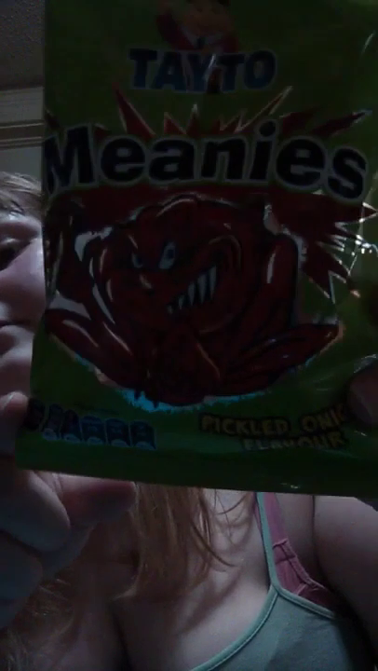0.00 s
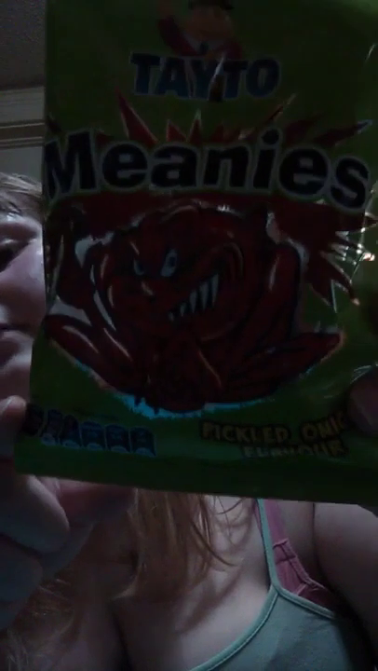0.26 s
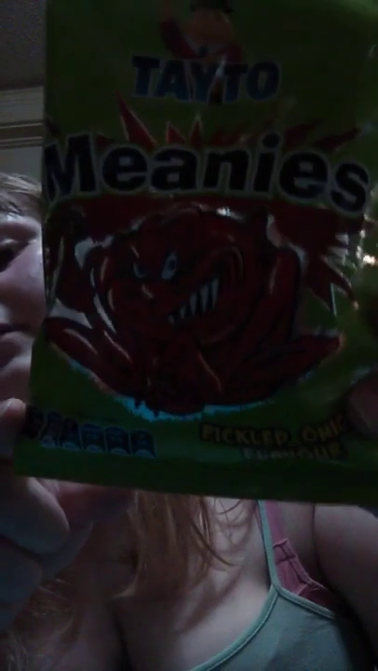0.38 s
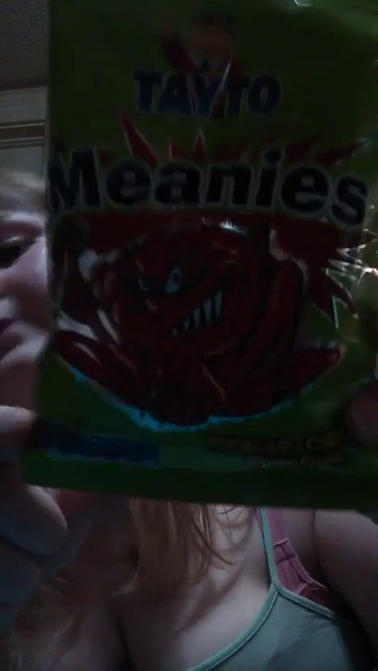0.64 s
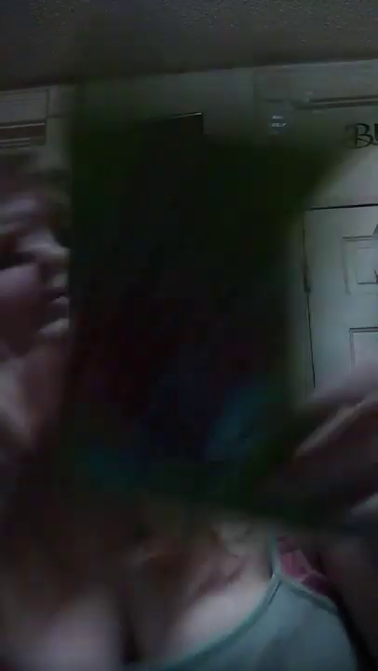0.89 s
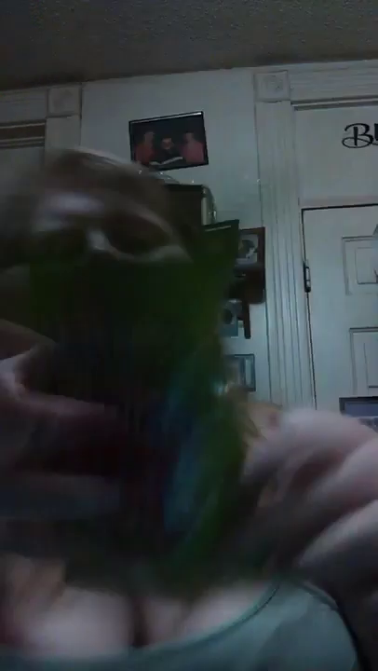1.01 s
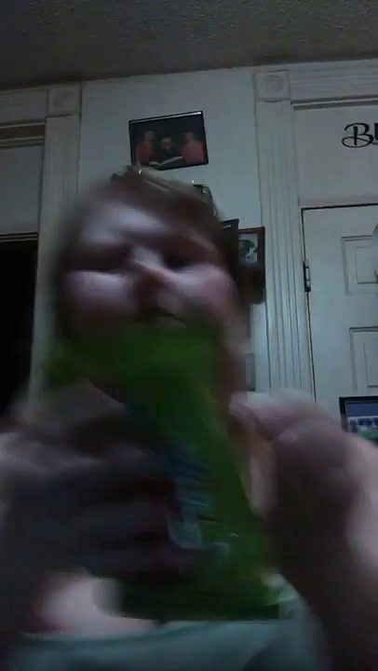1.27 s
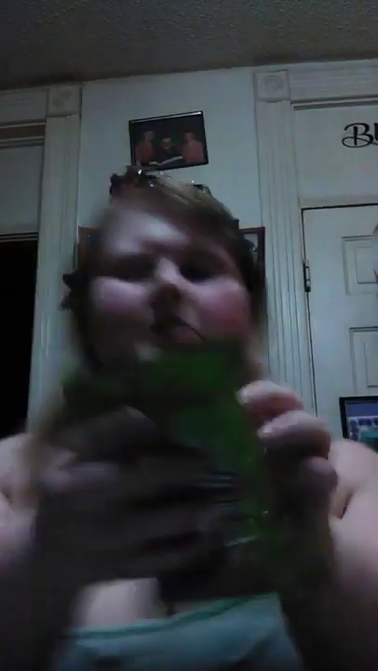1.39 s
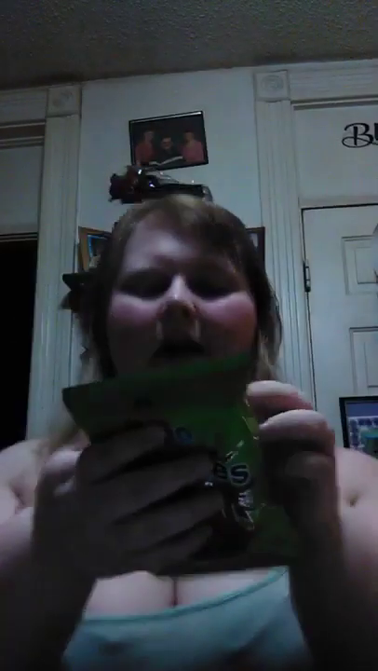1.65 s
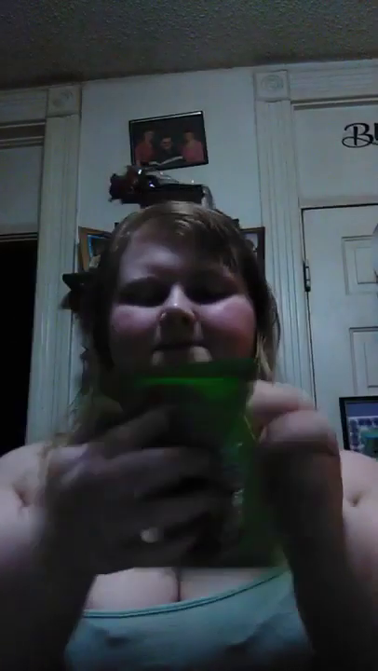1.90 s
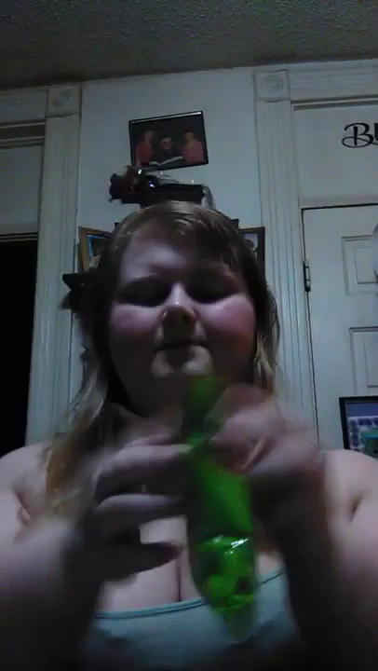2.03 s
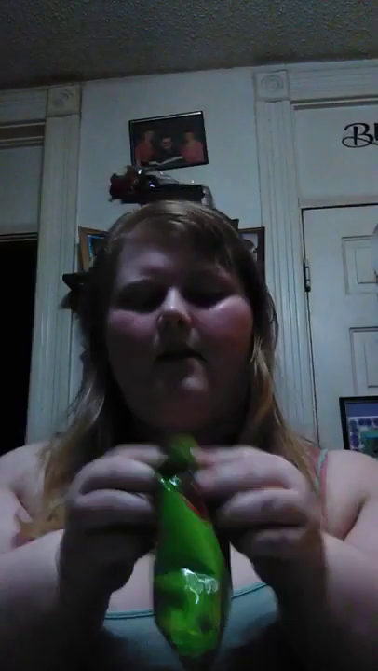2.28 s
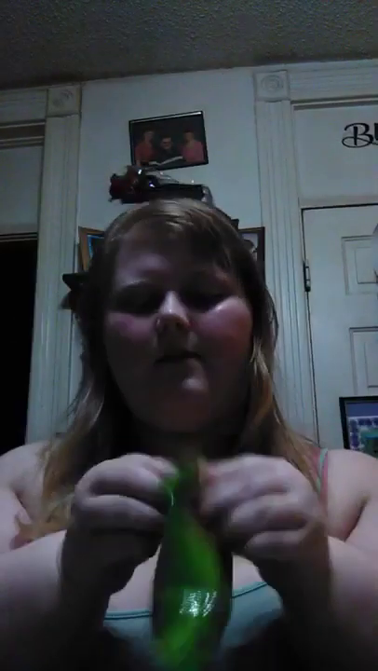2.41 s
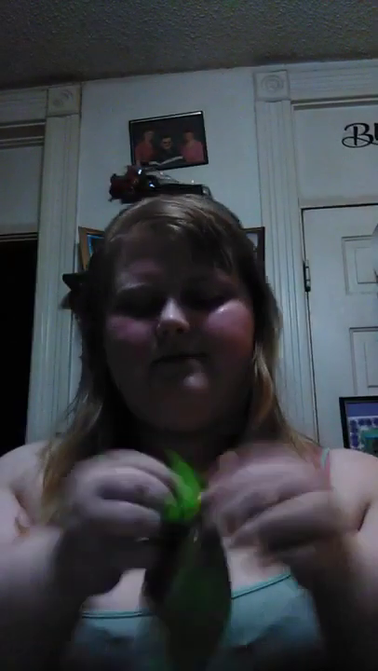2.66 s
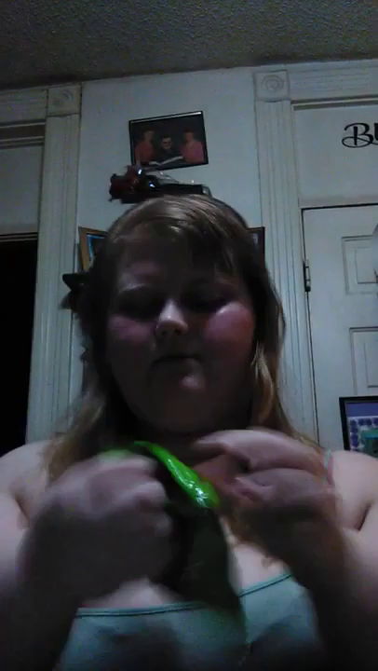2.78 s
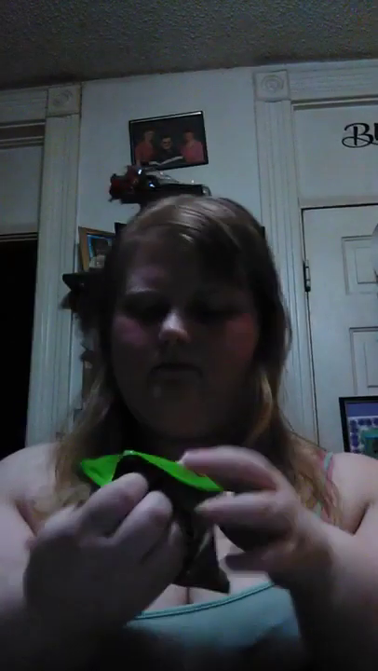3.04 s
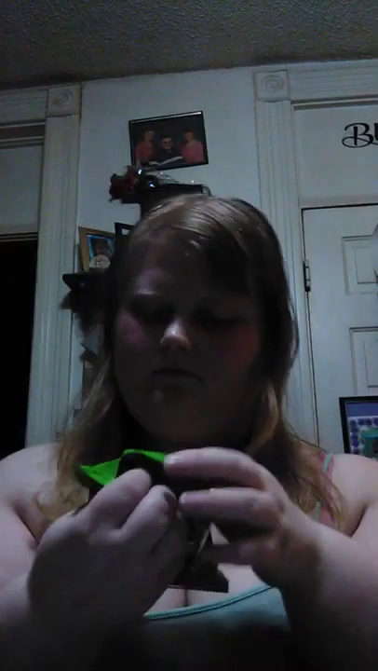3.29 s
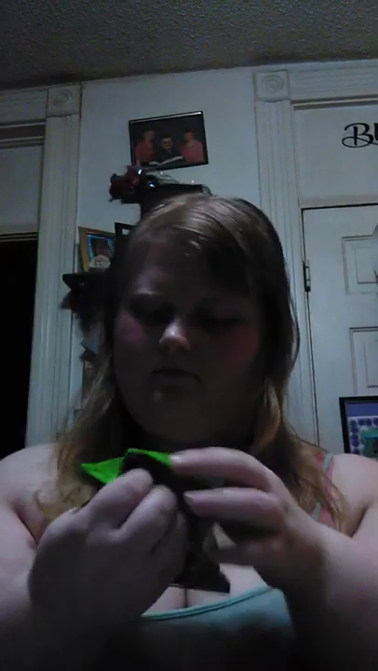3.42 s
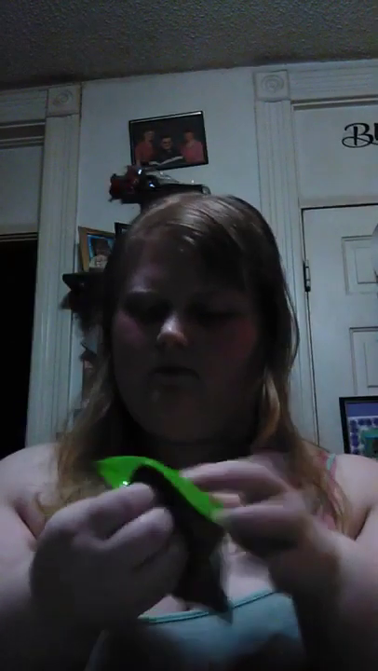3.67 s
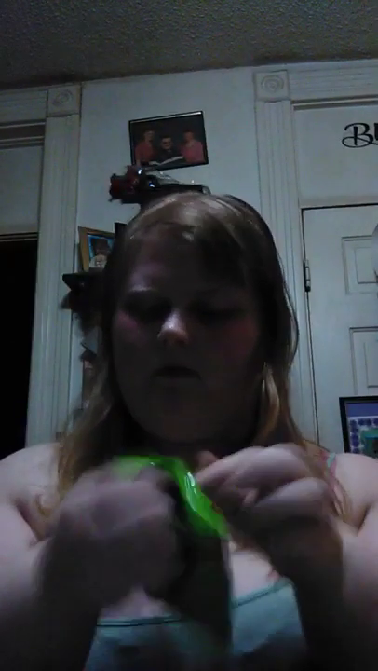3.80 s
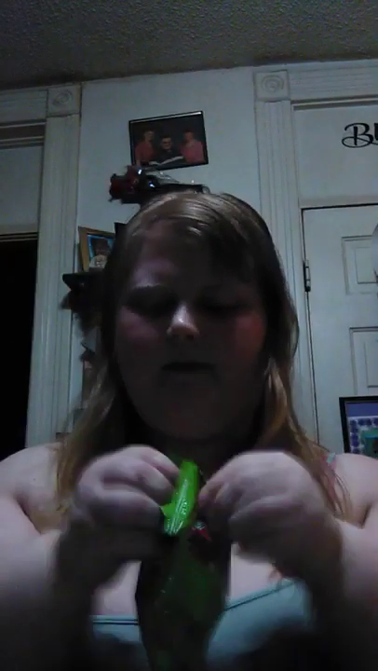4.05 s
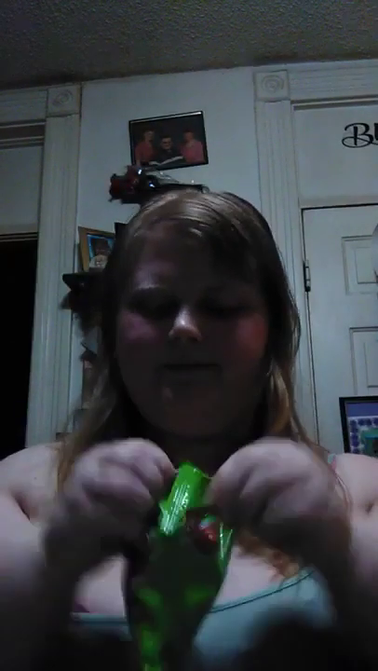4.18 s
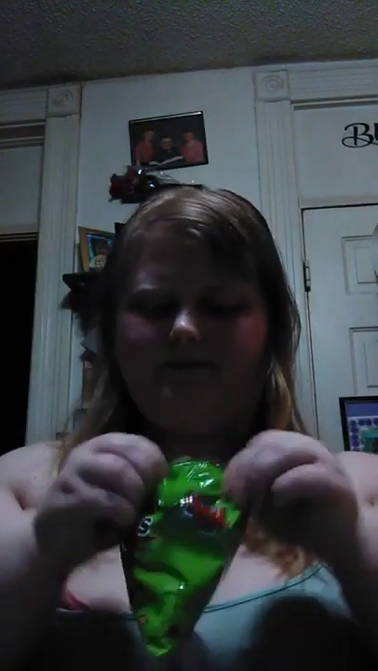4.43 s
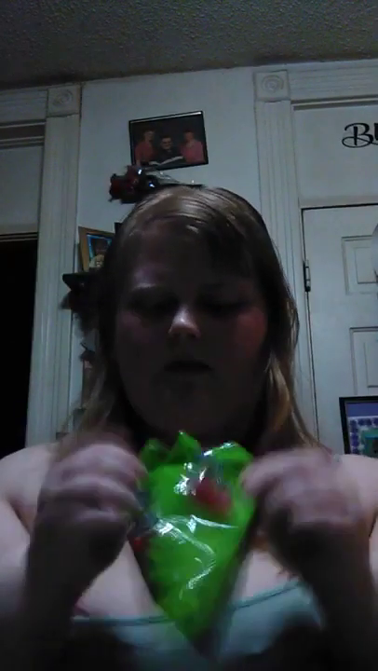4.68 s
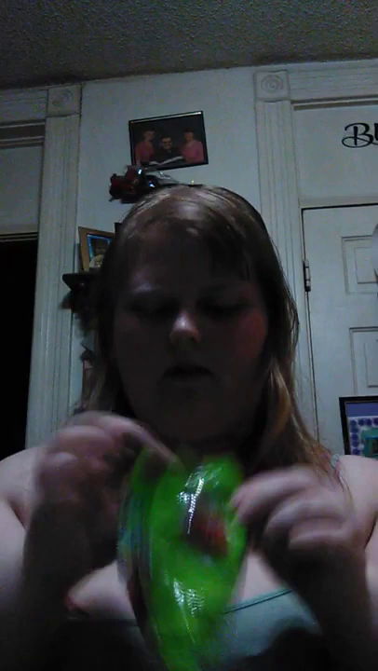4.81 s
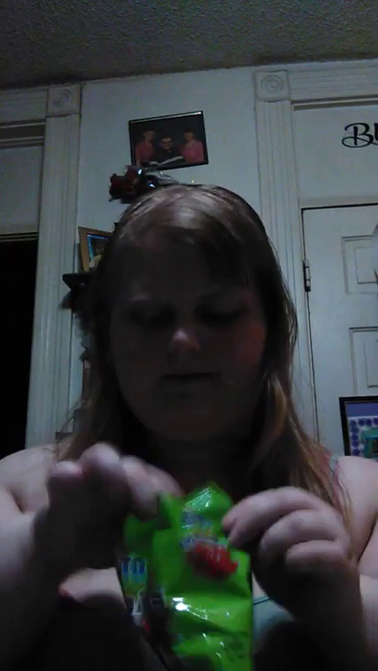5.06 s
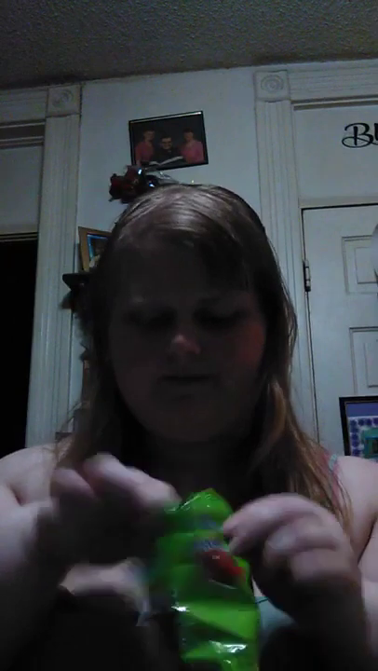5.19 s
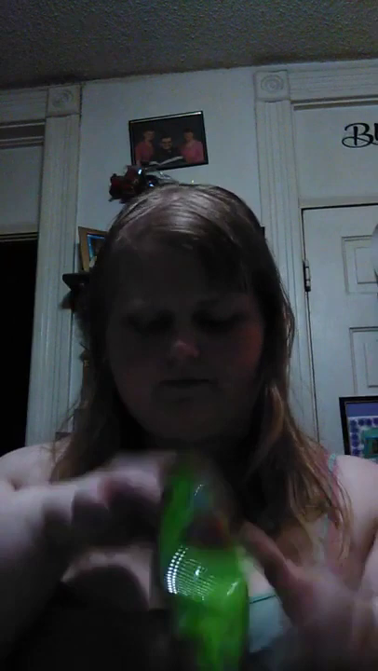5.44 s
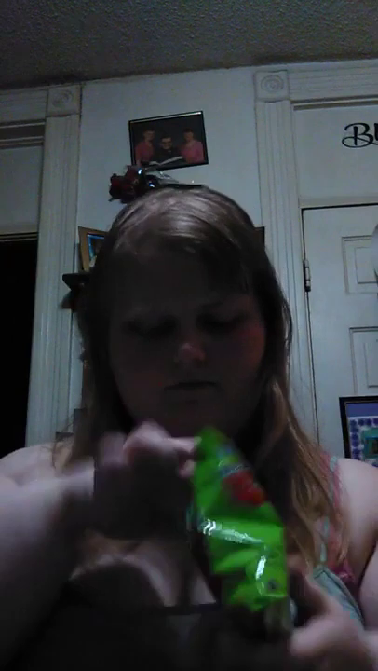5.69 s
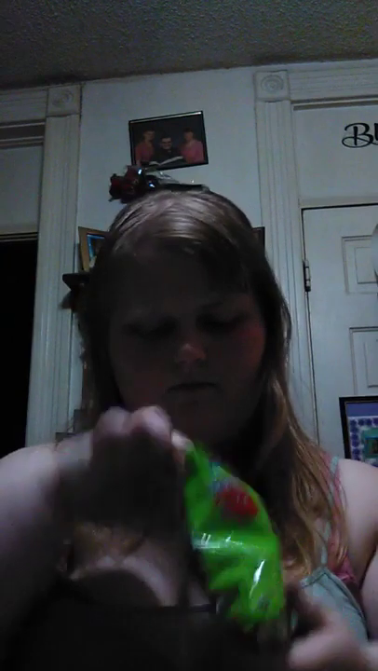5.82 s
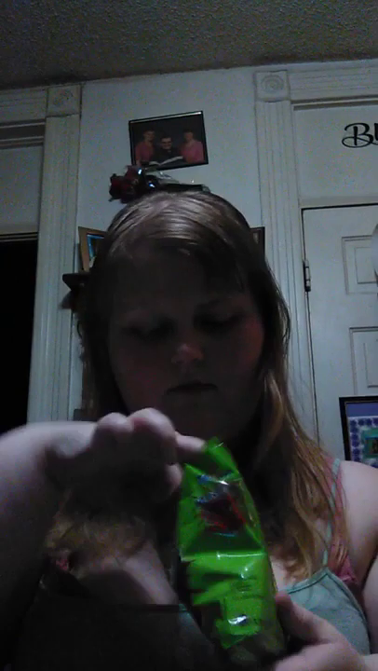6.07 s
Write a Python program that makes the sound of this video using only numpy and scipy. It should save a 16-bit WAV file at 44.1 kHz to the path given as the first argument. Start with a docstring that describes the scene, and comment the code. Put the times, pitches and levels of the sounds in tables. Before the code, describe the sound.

Close to a phone in a small room, hands work a foil-lined snack bag. After a quiet start come sharp snaps and brief crinkles, then thicker bursts of crackle with short gaps. The densest, loudest squeezing comes past the middle, and smaller rustles follow to the end. Low rumble and faint hiss fill the pauses.

```python
"""In a small room, a foil-lined snack packet is squeezed and pulled open by hand in front of a phone.
Creases snap through as short cracks, made of dying noise puffs, over a dense crackle of small creases.
Slack film and the air in the bag resonate as damped sines, the air mostly near 500 Hz.
The microphone ports ring near 8 kHz, the walls answer with echoes and a decaying noise tail,
and filtered noise gives the low rumble that fills the pauses and a faint hiss."""
import sys
import numpy as np
from scipy import signal
from scipy.fft import rfft, irfft, next_fast_len
from scipy.io import wavfile
from scipy.ndimage import uniform_filter1d, map_coordinates

SR = 44100
rng = np.random.default_rng(int(sys.argv[2]) if len(sys.argv) > 2 else 0)


def put_to_file(sound):
    """Save the sound as 16-bit audio at rate SR, in the file named by the first command-line argument."""
    columns = np.atleast_2d(sound).T  # one column per channel
    safe = np.clip(columns, -1, 1)
    whole_steps = np.round(safe * 32767)
    wavfile.write(sys.argv[1], SR, whole_steps.astype(np.int16))


N = 272097

# Creases that snap. Each row: start in seconds, crack level in dB,
# lower treble relative to the crack in dB, film body relative to the crack in dB.
SNAPS = [(0.2567, -29.5, -39, -43), (0.7102, -4.5, -15, -15.5), (0.7392, -15.5, -3.5, -6),
         (0.7832, -4, -13.5, -15), (0.79, -15, -6.5, -14), (0.8132, -14.5, -5, -17.5),
         (0.8466, -8, -13.5, -17), (0.8643, -22, -5.5, -4.5), (1.057, -8.5, -6, -17),
         (1.1189, -14, -14.5, -12), (1.1377, -4.5, -12, -16), (1.1555, -3, -17, -17),
         (1.229, -34.5, -17, 8.5), (1.2543, -12, -10, -12.5), (1.261, -8.5, -11, -14.5),
         (1.3424, -22.5, -3.5, -10.5), (1.3907, -26.5, -3, -22), (1.4332, -20, -9.5, -8),
         (1.4655, -30, -1.5, -2.5), (1.5187, -17.5, -1, -7.5), (1.5304, -22.5, 1, -20),
         (1.6282, -23, -2, -19), (1.6863, -35.5, -5, -3.5), (1.8232, -34.5, -9.5, -27.5),
         (1.9572, -30, -1, -21.5), (2.074, -2.5, -8, -22.5), (2.0853, -11.5, -16, -9.5),
         (2.147, -15.5, 2.5, -6), (2.1585, -24.5, -1, -17.5), (2.355, -34, -4, -10.5),
         (2.375, -12.5, -8, -12), (2.389, -6.5, -6, -19.5), (2.4597, -6.5, -10, -18.5),
         (2.489, -11, -4, -17), (2.507, -11.5, -1, -18), (2.5287, -16.5, -6, -20.5),
         (2.544, -15.5, -3, -22), (2.6, -10, -4.5, -26.5), (2.6368, -18, -2, -20), (2.6796, -14, -4.5, -20),
         (2.7101, -2.5, -8.5, -21.5), (2.7817, -16.5, -5.5, -11.5), (2.8348, -21, -7, -29),
         (2.8597, -18, -5, -26.5), (2.9617, -24, -5.5, -25), (2.978, -15, -6, -12.5),
         (3.0044, -18, -10, -22.5), (3.019, -16.5, -3, -14), (3.0487, -10.5, -9, -18),
         (3.2237, -22.5, -11.5, -24), (3.5882, -23, -13.5, -33), (3.6458, -3.5, -12, -20),
         (3.7873, -33.5, -31, -23.5), (3.874, -11, -3, -13.5), (3.8817, -14, -7, -10.5),
         (3.8943, -21.5, -8, -20.5), (3.9587, -12.5, -12.5, -15), (3.9674, -9.5, -14, -23),
         (4.0158, -14.5, -10, -14), (4.0432, -7, -20, -22), (4.0497, -8, -13.5, -15), (4.076, -11, -6, -22),
         (4.1195, -7, -7.5, -18), (4.141, -14.5, -5, -20.5), (4.155, -11, -7, -12),
         (4.1705, -11, -6.5, -16.5), (4.182, -15, -3.5, -13.5), (4.19, -5, -7, -10),
         (4.2067, -6.5, -7, -16.5), (4.2224, -13, -8, -15), (4.2498, -7, -4.5, -14.5),
         (4.2799, -4, -10.5, -23), (4.308, -11, -7, -11.5), (4.3195, -12, -5.5, -13),
         (4.3367, -7.5, -1.5, -23), (4.3702, -14, -4, -16.5), (4.379, -12, -2, -17),
         (4.4301, -22, -13, -17), (4.4635, -8, -25, -23), (4.476, -13, -10, -16.5),
         (4.5193, -14.5, -2.5, -17), (4.5365, -10.5, -2.5, -14), (4.5451, -3, -11.5, -13),
         (4.5777, -4.5, -6.5, -17), (4.6074, 0.5, -8.5, -22.5), (4.6463, -8.5, -14, -24),
         (4.6965, -12, -7, -15.5), (4.7137, -8.5, -14.5, -19), (4.729, -8.5, -11.5, -17),
         (4.7368, -6.5, -8, -17.5), (4.813, -24.5, 0, -14.5), (4.8934, -21, -1, -18.5),
         (4.9035, -15, -8.5, -25), (5.033, -28.5, -6, 4), (5.0555, -18, 0, -3.5), (5.0775, -19, 3, -38),
         (5.1662, -14, -14.5, -48), (5.1775, -17.5, -5, -22.5), (5.224, -19, -3.5, -21),
         (5.2707, -7.5, -10, -23), (5.3268, -3.5, -5.5, -22), (5.439, -23, -4, -16),
         (5.4551, -21.5, -10.5, -21.5), (5.4907, -23.5, -6, -14), (5.5425, -17.5, -20, -19.5),
         (5.6186, -33.5, -3.5, -15.5), (5.7034, -23.5, 0, -14), (5.7215, -12, 1, -14.5),
         (5.7253, -7.5, -18, -20.5), (5.7375, -7.5, -16.5, -13.5), (5.879, -7.5, -34, -26),
         (5.9238, -20.5, -12, -32), (5.9928, -17.5, -8.5, -8.5), (6.0105, -25.5, -8, -14),
         (6.019, -10, -18, -17), (6.041, -10.5, -4, -11.5), (6.0512, -18, -5, -12),
         (6.098, -9.5, -21, -27.5), (6.116, -19, -5.5, -15), (6.1604, -11, -9, -9)]


def snaps(steps=2):
    """Snap-through buckling: a big crease gives way in two steps within milliseconds."""
    s, db, sizzle_db, film_db = np.repeat(SNAPS, steps, axis=0).T
    luck = rng.random((len(s), 3))
    step = np.arange(len(s)) % steps
    step_s = s - 0.0003 + 0.0022 * step * (0.5 + luck[:, 0])
    step_db = db - 7 * step * (0.5 + luck[:, 1])  # the second step is weaker
    pan_db = 3 + 5 * (luck[:, 2] - 0.5)
    return packet(step_s, step_db, sizzle_db, film_db, pan_db)


# Spectrum of a crack as the ports colour it.
# Each row: frequency in Hz, relative spectral density in dB.
CRACK_SPECTRUM = [(4500, -42), (6300, -10), (7200, -3), (8400, 0.5), (9600, -6.5), (11200, -13),
                  (13800, -17), (14500, -30), (14800, -52.5)]
# Lower treble of a crack. Each row: frequency in Hz, relative spectral density in dB.
SIZZLE_SPECTRUM = [(2600, -52), (3800, -4), (5200, 0.5), (6400, 3), (8500, -42.5)]
# Body of the rattling film. Each row: frequency in Hz, relative spectral density in dB.
FILM_SPECTRUM = [(700, -52.5), (1100, -5.5), (1500, 2), (2400, 1), (3600, 4), (5500, -18.5)]


def packet(s, db, sizzle_db, film_db, pan_db):
    """Impulsive excitation: each crease cracks, rattles the film and rings a large and a small panel."""
    luck = rng.random((len(s), 2))
    crack = coloured(puffs(s, db, pan_db, t60=0.007, alike=0.3), CRACK_SPECTRUM)
    sizzle = coloured(puffs(s, db + sizzle_db, pan_db - 3, t60=0.0073, alike=0.12), SIZZLE_SPECTRUM)
    rattle = coloured(puffs(s, db + film_db, pan_db - 3, t60=0.046, alike=0.7), FILM_SPECTRUM)
    # each panel draws its own pitch
    large_hz = 1150 * 3.02 ** luck[:, 0]
    small_hz = 4500 * 2.6 ** luck[:, 1]
    large = rings(s, db + film_db - 3, pan_db + 2, large_hz, peak_rad=2.94, turn=0.41, lead=1.68, size=224)
    small = rings(s, db + sizzle_db / 2 - 6.5, pan_db, small_hz, peak_rad=4.5, turn=1.6, size=128)
    return crack + sizzle + rattle + large + small


# Air pushed in the bag by small creases.
# Each row: frequency in Hz, relative spectral density in dB.
BAG_AIR_SPECTRUM = [(200, -31), (380, -3.5), (500, 5.5), (720, 0.5), (1000, -6), (1600, -38)]


def crackle(count=3100):
    """Crackling noise: random small creases, mostly tiny and in clumps, follow the squeezing."""
    luck = rng.random((count, 6))
    first_s = HANDLING[0][0]
    s = first_s + luck[:, 0] * (N / SR - first_s)
    db, film_db, air_db = squeezing(s)
    force = np.clip((db + 60) / 40, 0.2, 1)  # a light touch rustles evenly, a hard grip crackles
    clump_db = 2.67 * wobble(35)[(s * SR).astype(int)]
    crease_db = -4.93 * np.log(luck[:, 1] + 0.033) - 5.5  # few large, many tiny
    db = db + force * (clump_db + crease_db)
    pan_db = 3 + 8 * (luck[:, 4] - 0.5)
    puff_db = db + air_db + 9 * (luck[:, 3] - 0.5)
    air = coloured(puffs(s, puff_db, pan_db + 0.5, t60=0.017, alike=0.92), BAG_AIR_SPECTRUM)
    sizzle_db = film_db + 5 + 22 * (luck[:, 5] - 0.5)
    body_db = film_db + 18 * (luck[:, 2] - 0.5)
    return air + packet(s, db, sizzle_db, body_db, pan_db)


# Grips of the hand. Each row: moment of full force in seconds, time held in seconds,
# crackle level in dB, film body relative to it in dB, bag air relative to it in dB.
GRIPS = [(0.261, 0.014, -51.5, -35, -35), (0.718, 0.0071, -26, -7.5, -19.5), (.79, 0.13, -45, -5.5, -25),
         (1.058, 0.0081, -34, -3.5, -17.5), (1.121, 0.013, -25.5, -2.5, -17),
         (1.142, 0.038, -17.5, -13.5, -19.5), (1.258, 0.0043, -39, 0.5, -2),
         (1.527, 0.014, -41.5, -14.5, -19), (1.635, 0.043, -42, -24, -35), (1.962, 0.071, -35.5, -9, -16),
         (2.054, 0.0081, -28, -3.5, -17.5), (2.079, 0.011, -22.5, -8.5, -18),
         (2.154, 0.028, -15, -17, -23.5), (2.37, 0.018, -19.5, -12.5, -21.5),
         (2.491, 0.085, -25.5, -10, -8), (2.64, 0.069, -24, -13.5, -14), (2.703, 0.0099, -19, -12, -20),
         (2.981, 0.066, -29.5, -16, -17.5), (3.047, 0.0067, -25, -15, -17.5),
         (3.23, 0.048, -39.5, -30.5, -34), (3.59, 0.076, -42, -25, -20.5), (3.879, 0.05, -31.5, -13, -15.5),
         (3.962, 0.011, -26.5, -17.5, -15.5), (4.044, 0.029, -27, -10, -12), (4.125, 0.12, -20, -12.5, -16),
         (4.231, 0.064, -25.5, -14, -11), (4.317, 0.023, -19.5, -18, -13), (4.517, 0.053, -11.5, -13, -14),
         (4.61, 0.023, -22, -12, -13), (4.716, 0.0058, -26.5, -9, -14), (4.901, 0.052, -32.5, -17, -29),
         (5.031, 0.081, -25.5, -17, -17.5), (5.178, 0.059, -18, -16.5, -19), (5.276, 0.053, -18, -13, -18),
         (5.445, 0.088, -40.5, -11, -17.5), (5.642, 0.012, -43, -13, -15),
         (5.724, 0.014, -20.5, -13.5, -25), (5.886, 0.1, -35, -11.5, 1), (6.013, 0.052, -23, -16, -18)]
TIGHTEN_DB_PER_S, LET_GO_DB_PER_S = 894, 261
# Rustle in the fingers between grips. Each row: time in seconds, crackle level in dB.
HANDLING = [(.25, -79.5), (.5, -74), (.54, -62), (.69, -42), (.97, -45.5), (1.05, -43), (1.5, -43.5),
            (1.8, -68.5), (1.94, -42), (2.3, -39.5), (2.9, -48.5), (3.15, -59.5), (3.5, -68.5),
            (3.84, -65.5), (4.1, -23), (4.48, -28.5), (4.87, -62), (5.0, -43), (5.65, -50.5), (5.8, -37),
            (6.17, -28)]
HANDLING_FILM_DB, HANDLING_AIR_DB = -13, -24  # relative to the crackle


def squeezing(s):
    """Dominance of the strongest force: crackle, film and air levels as grips tighten, hold and let go."""
    full, held, db, film_db, air_db = np.transpose(GRIPS)[:, :, None]
    tightening = TIGHTEN_DB_PER_S * np.maximum(full - s, 0)
    letting_go = LET_GO_DB_PER_S * np.maximum(s - full - held, 0)
    handling = np.interp(s, *np.transpose(HANDLING))
    level = np.vstack([db - tightening - letting_go, handling])
    which = level.argmax(axis=0)
    film = np.append(film_db, HANDLING_FILM_DB)[which]
    air = np.append(air_db, HANDLING_AIR_DB)[which]
    return level.max(axis=0), film, air


# Slack panels of film that ring out. Each row: start in seconds, relative level in dB, pitch in Hz.
PANELS = [(1.1183, -29, 1640), (2.681, -27.5, 1510), (4.1908, -22.5, 1520), (4.2506, -21.5, 1760),
          (4.815, -33, 2600), (5.0579, -19, 1770), (5.3334, -21.5, 1480), (5.651, -35, 1470),
          (5.878, -26.5, 1460), (6.049, -22, 2000)]


def panels():
    """Damped plate resonance: a slack panel rings briefly after its crease gives way."""
    s, db, hz = np.transpose(PANELS)
    pan_db = np.full(len(s), -0.6)
    return rings(s - 0.0015, db - 1.5, pan_db, hz, peak_rad=11, turn=0.44, size=768)


# Air in the bag, pumped until it booms. Each row: start in seconds, relative level in dB, pitch in Hz.
BOOMS = [(0.709, -42, 396), (1.054, -40.5, 356), (1.15, -33.5, 385), (1.986, -41, 490), (2.076, -32.5, 485),
         (2.367, -31, 538), (2.506, -35.5, 530), (2.565, -32, 567), (2.712, -34, 440), (2.784, -42.5, 570),
         (2.978, -32, 507), (3.873, -42.5, 716), (4.034, -39, 560), (4.121, -33.5, 523), (4.298, -35, 620),
         (4.525, -26, 623), (4.576, -27, 504), (4.608, -29, 483), (4.942, -38, 530), (5.055, -36, 630),
         (5.193, -34, 774), (5.27, -30, 710), (3.733, -52, 406), (5.331, -39.5, 457), (5.547, -45.5, 253),
         (5.77, -42, 750), (5.997, -44, 313)]
# Jolts that reach the phone through hand and table. Each row: start in seconds, relative level in dB.
JOLTS = [(0.71, -52.5), (0.782, -47), (3.646, -53), (4.547, -47)]


def booms():
    """Cavity resonance: the air pocket rings a few cycles, louder at the left; jolts are low pushes."""
    s, db, hz = np.transpose(BOOMS)
    air = rings(s - 0.0015, db + 3, np.full(len(s), 5.0), hz, peak_rad=9.8, turn=0.29, size=1024)
    s, db = np.transpose(JOLTS)
    hz = np.full(len(s), 110.0)
    jolts = rings(s - 0.0015, db + 17, np.full(len(s), 5.0), hz, peak_rad=0.33, turn=0.34)
    return air + jolts


def puffs(s, db, pan_db, t60, alike, size=192):
    """Transient noise with exponential decay, cut after size samples; both ports share the part alike."""
    t = np.arange(size) / SR
    draw = rng.standard_normal((len(s), 3 * size + 1))
    life = t60 * amp(2.5 * draw[:, -1:])  # t60 in seconds is the median life
    shape = amp(-60 * t / life) * (1 - np.exp(-t / 0.00062))
    common, left, right = np.split(draw[:, :-1], 3, axis=1)
    ports = []
    for own in (left, right):
        puff = shape * (np.sqrt(alike) * common + np.sqrt(1 - alike) * own)
        ports.append(amp(db[:, None]) * puff / np.abs(puff).max(axis=1, keepdims=True))
    return placed(s, pan_db, ports)


def rings(s, db, pan_db, hz, peak_rad, turn, lead=0, size=512):
    """Damped resonance: sines swell for about peak_rad radians, then die; the ports differ in phase."""
    phase = 2 * np.pi * hz[:, None] * np.arange(size) / SR
    draw = rng.standard_normal((len(s), 2))
    fade = phase / (peak_rad * amp(2 * draw[:, :1]))
    shape = amp(db[:, None]) * np.e * fade * np.exp(-fade) * np.hanning(2 * size)[size:]
    apart = lead + turn * draw[:, 1:]  # radians between the ports: mean lead, spread turn
    return placed(s, pan_db, [shape * np.sin(phase + side * apart) for side in (0.5, -0.5)])


def placed(s, pan_db, ports):
    """Superposition: adds one row of samples per event and port; pan_db is left over right."""
    size = ports[0].shape[1]
    start = np.round(np.clip(s, 0, N / SR) * SR).astype(int)
    at = (start[:, None] + np.arange(size)).ravel()
    trains = []
    for side, port in zip((0.5, -0.5), ports):
        panned = amp(side * pan_db)[:, None] * port
        trains.append(np.bincount(at, panned.ravel(), N + size + 1)[:N])
    return np.array(trains)


# First echoes from the walls. Each row: delay in seconds, relative level in dB.
WALLS = [(.0045, -21), (.009, -19), (.014, -21), (.019, -18), (.025, -22)]
# Reverberation. Each row: frequency in Hz, time to decay by 60 dB in seconds.
ROOM_T60 = [(400, 0.074), (1500, 0.17), (4000, 0.2), (9000, 0.21), (15000, 0.02)]
# Sound from all sides favours the port ring. Each row: frequency in Hz, relative response in dB.
DIFFUSE = [(300, -2), (2000, 6), (5000, 5), (7000, 3), (8400, 4.5), (10000, 7), (15000, -4.5)]


def room(x, piece=8192):
    """Reverberation by convolution: the packet moves, so every piece of sound gets new echoes and tail."""
    wet = np.zeros((2, N + piece + SR))
    for start in range(0, N, piece):
        noise = rng.standard_normal((2, SR // 3))
        hz, t, z = signal.stft(noise, SR, nperseg=256)
        decay = amp(-60 * t / along(ROOM_T60, hz)[:, None])
        tail = signal.istft(z * decay, SR, nperseg=256)[1]
        tail = amp(-11) * tail / np.linalg.norm(tail[0])
        tail = tail * (1 - np.exp(-np.arange(tail.shape[1]) / SR / 0.0016))  # soft onset
        for s, db in WALLS:
            # each port hears the echo up to 29 samples later
            tail[[0, 1], round(s * SR) + rng.integers(0, 30, 2)] += amp(db)
        answer = signal.fftconvolve(x[:, start:start + piece], tail, axes=1)
        wet[:, start:start + answer.shape[1]] += answer
    return coloured(wet, DIFFUSE)


# Low rumble. Each row: frequency in Hz, relative spectral density in dB.
RUMBLE_SPECTRUM = [(25, -34.5), (55, -6.5), (105, -9), (135, 7), (165, -0.5), (250, -2), (380, -11),
                   (500, -19), (900, -45.5), (1500, -85.5)]
# Hiss of the ports. Each row: frequency in Hz, relative spectral density in dB.
HISS_SPECTRUM = [(500, 15.5), (1300, 7.5), (2500, 4), (4000, -6.5), (7500, 0), (14300, -11), (14900, -44)]
RUMBLE_DB, SWELL_DB = -59, 2.5  # mid level, and spread of its random swell
RUMBLE_FOLLOWS = 0.039  # dB of rumble per dB of squeezing: the hands shake the table


def background():
    """Stationary and modulated noise: a lumpy rumble, nearly equal at both ports, and each port's hiss."""
    common, left, right = coloured(rng.standard_normal((3, N)), RUMBLE_SPECTRUM)
    hop = 441
    effort_db = np.repeat(squeezing(np.arange(0, N, hop) / SR)[0], hop)[:N]
    effort_db = uniform_filter1d(effort_db, size=SR // 4)
    follow_db = RUMBLE_FOLLOWS * (effort_db - effort_db.mean())
    level = amp(RUMBLE_DB + SWELL_DB * wobble(14) + follow_db)
    rumble = level * (common * amp([[0.8], [-0.8]]) + 0.075 * np.array([left, right]))
    hiss = amp(-69) * coloured(rng.standard_normal((2, N)), HISS_SPECTRUM)
    return rumble + hiss


def coloured(x, spectrum):
    """Minimum-phase filtering: x through a causal filter of that spectrum; white noise keeps its rms."""
    hz = np.fft.rfftfreq(4096, 1 / SR)
    cepstrum = irfft(np.log(amp(along(spectrum, hz))))
    # folding the cepstrum onto positive time makes the filter causal
    cepstrum[1:2048] *= 2
    cepstrum[2049:] = 0
    pulse = irfft(np.exp(rfft(cepstrum)))
    return signal.fftconvolve(x, pulse[None] / np.linalg.norm(pulse), axes=1)[:, :N]


def wobble(rate):
    """Slow random modulation: a smooth curve through rate random knots a second."""
    knots = rng.standard_normal(int(N * rate / SR) + 4)
    return map_coordinates(knots, [np.arange(N) * rate / SR])


def along(points, hz):
    """Logarithmic pitch scale: reads (Hz, value) points along a log frequency axis."""
    f, v = np.transpose(points)
    return np.interp(np.log(hz + 1), np.log(f + 1), v)


def amp(db):
    """Decibel law: the amplitude gain of a level in dB."""
    return 10 ** (np.asarray(db) / 20)


def scene():
    """Superposition of the packet, the answer of the walls and the background."""
    near = snaps() + panels() + booms() + crackle()
    return near + room(near) + background()


def record(dry):
    """Overload and band limiting: the phone clips at full scale and keeps nothing above its limit."""
    top_hz = 15536
    m = next_fast_len(N + 4096)
    clipped = np.clip(dry, -1, 1)
    kept = np.fft.rfftfreq(m, 1 / SR) < top_hz
    limited = irfft(rfft(clipped, m) * kept, m)[:, :N]
    return np.clip(limited, -1, 1)


dry = scene()
out = record(dry)
put_to_file(out)
```